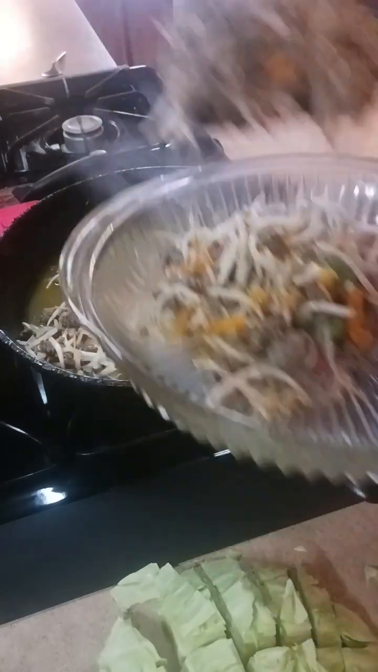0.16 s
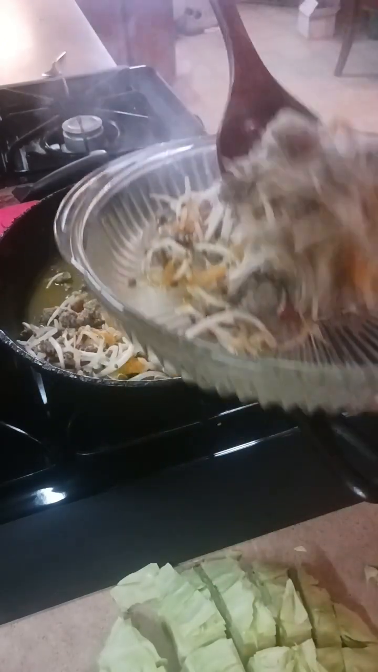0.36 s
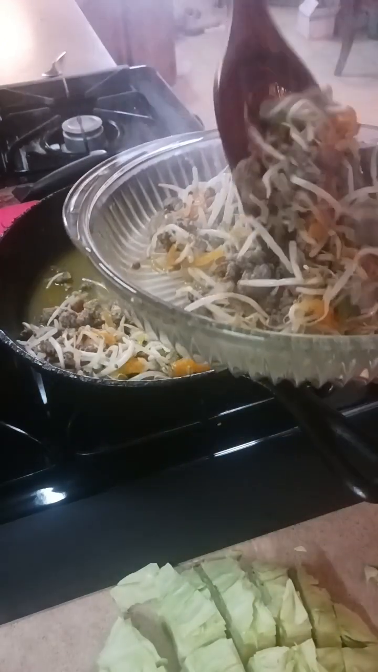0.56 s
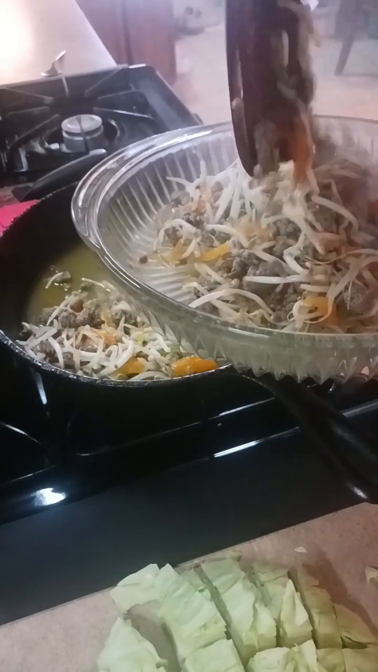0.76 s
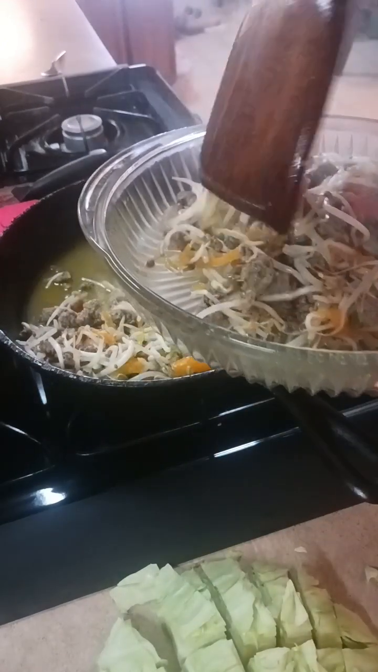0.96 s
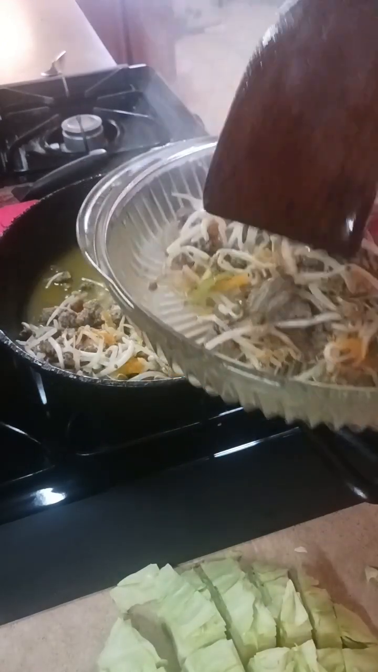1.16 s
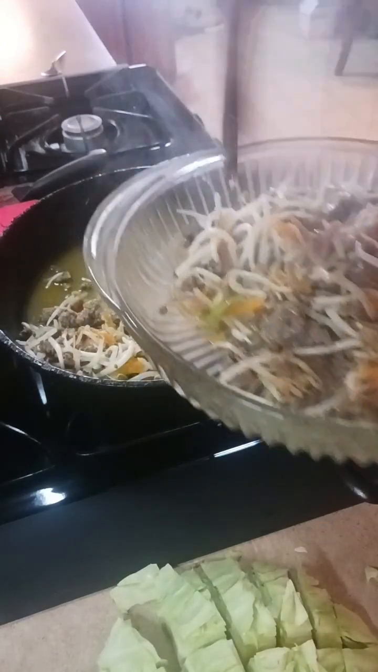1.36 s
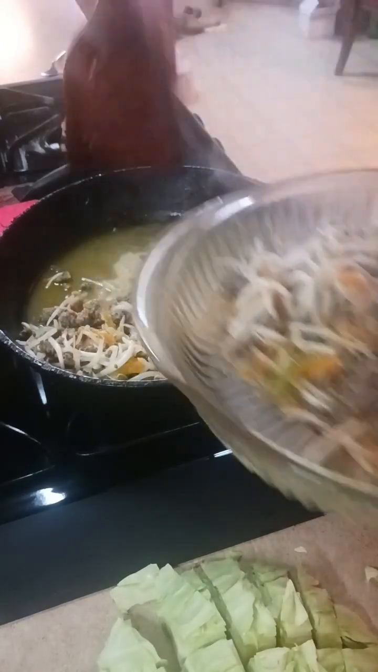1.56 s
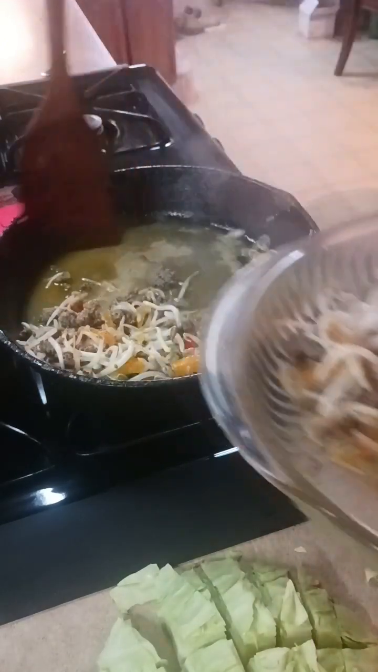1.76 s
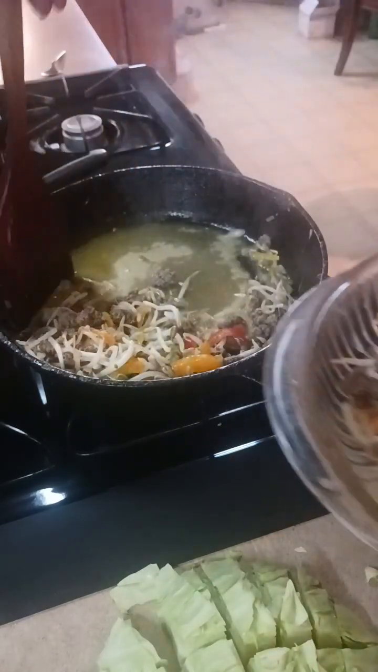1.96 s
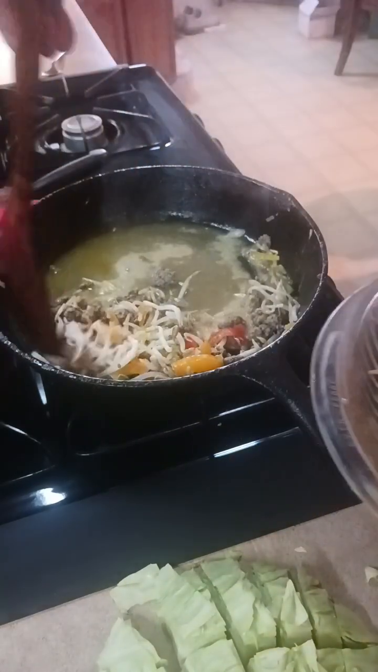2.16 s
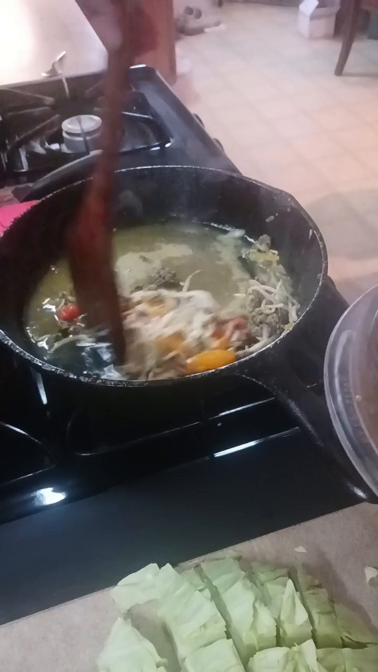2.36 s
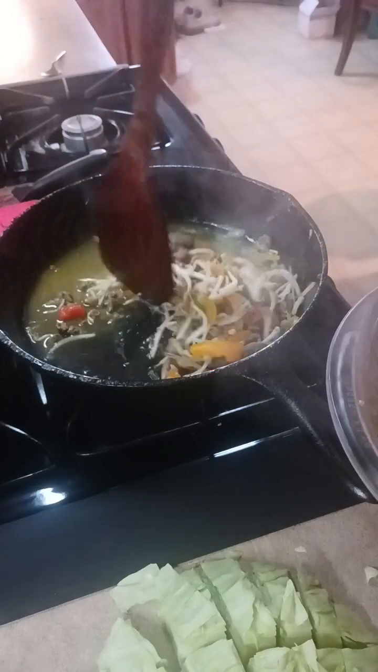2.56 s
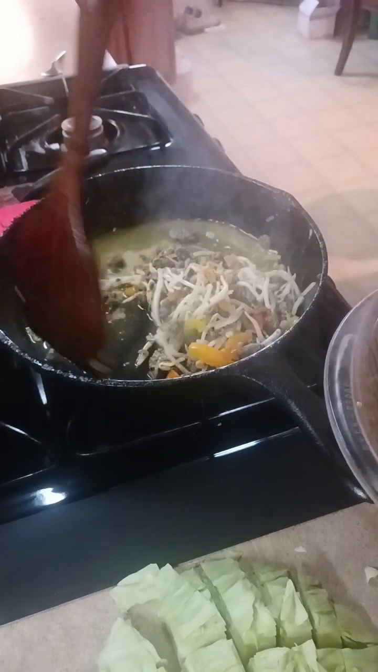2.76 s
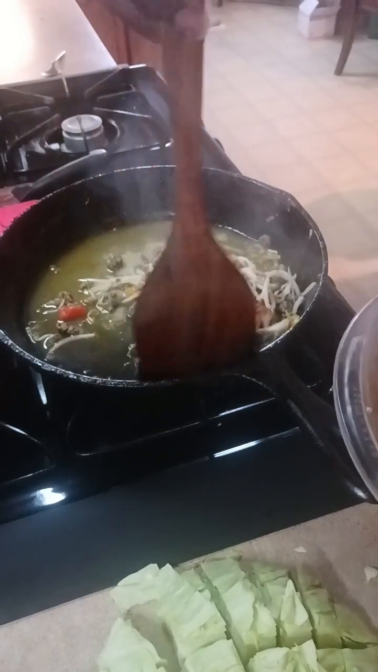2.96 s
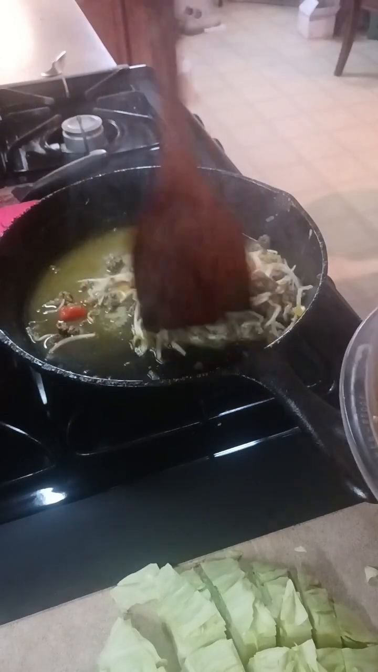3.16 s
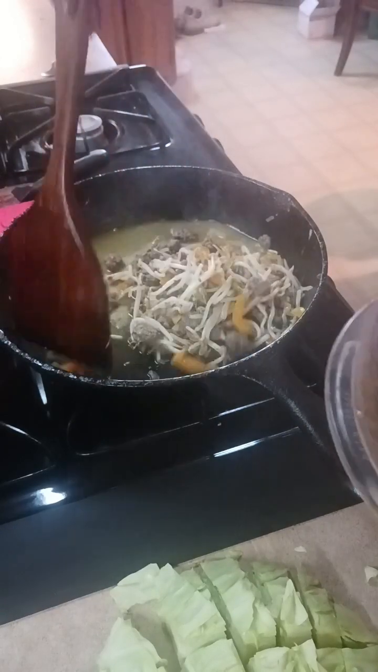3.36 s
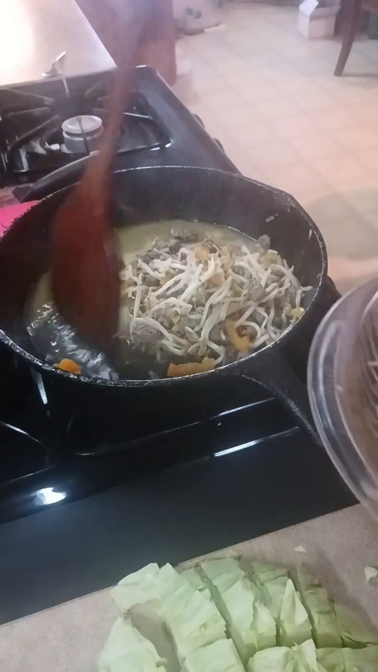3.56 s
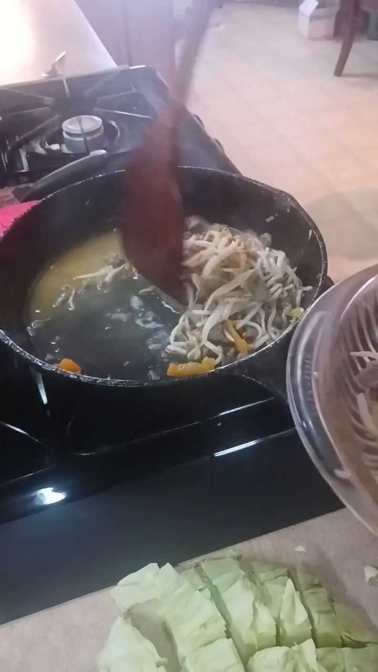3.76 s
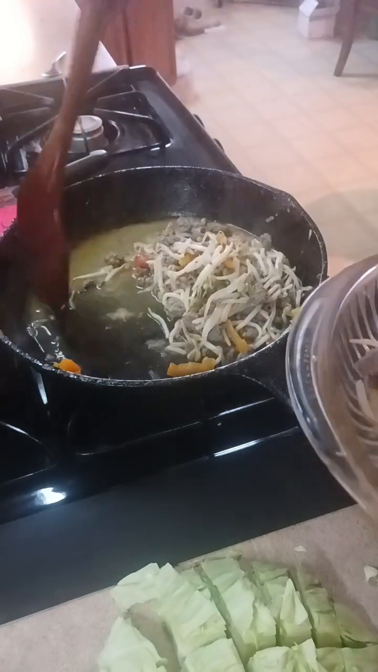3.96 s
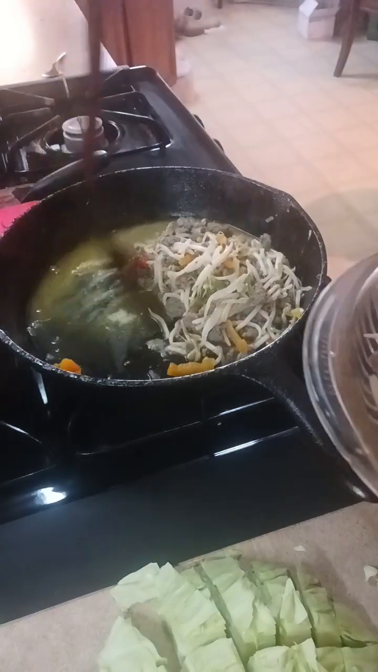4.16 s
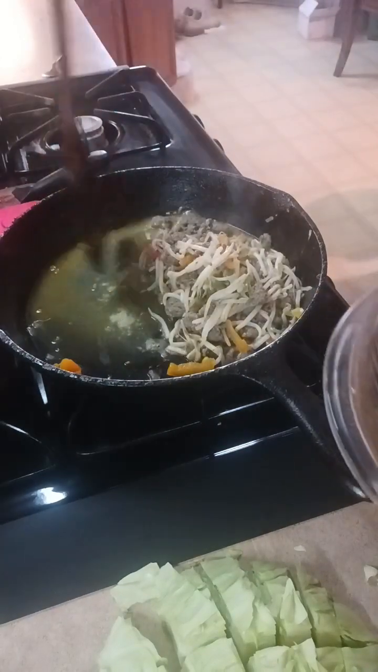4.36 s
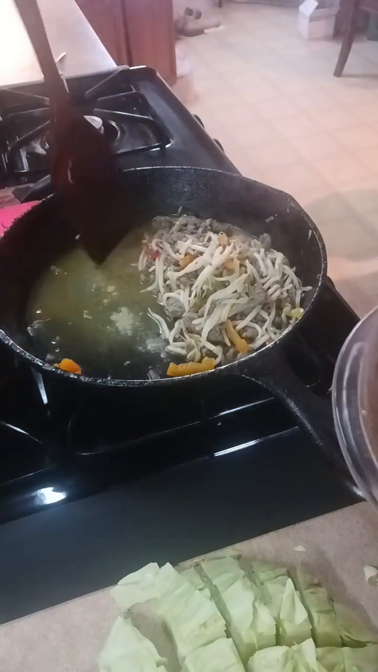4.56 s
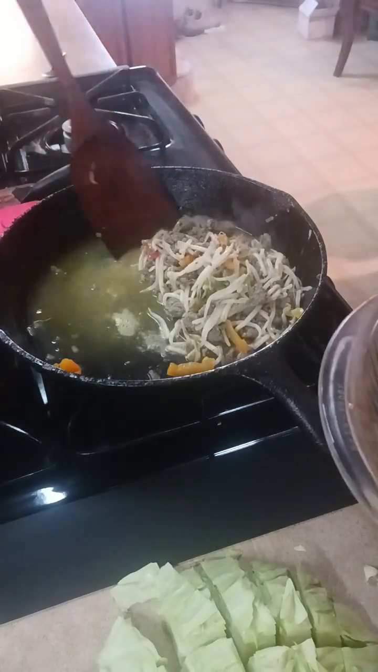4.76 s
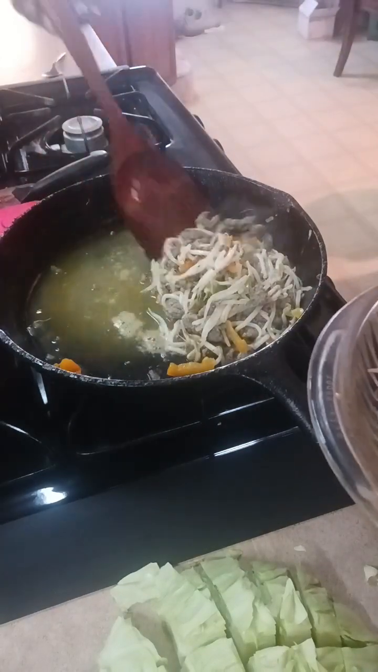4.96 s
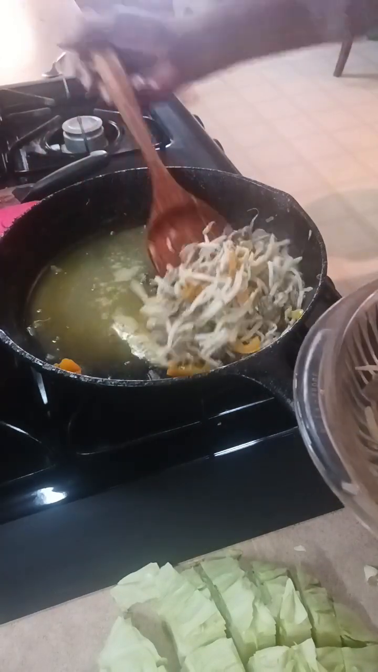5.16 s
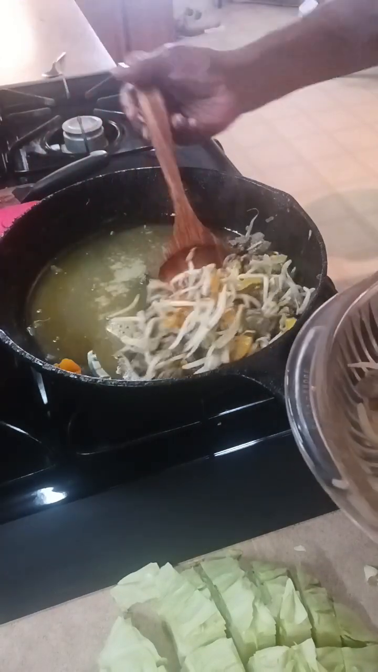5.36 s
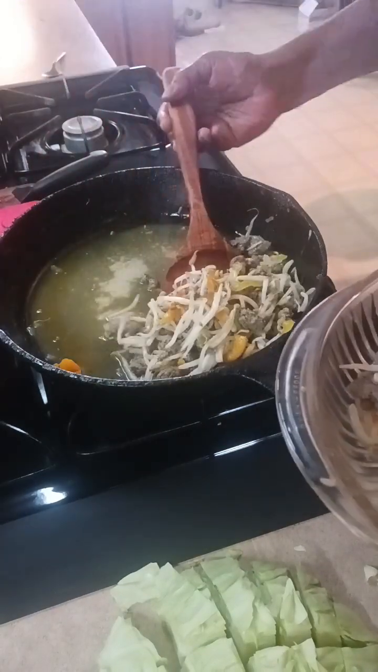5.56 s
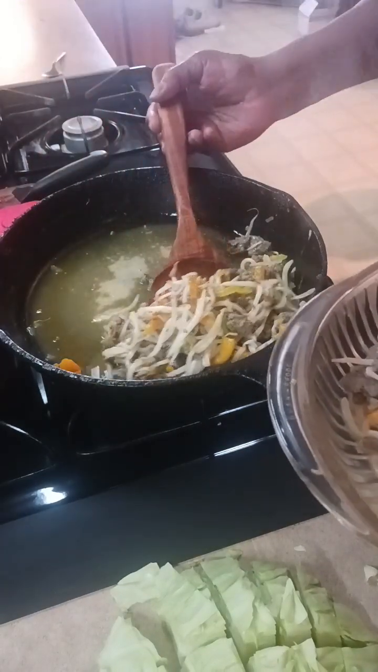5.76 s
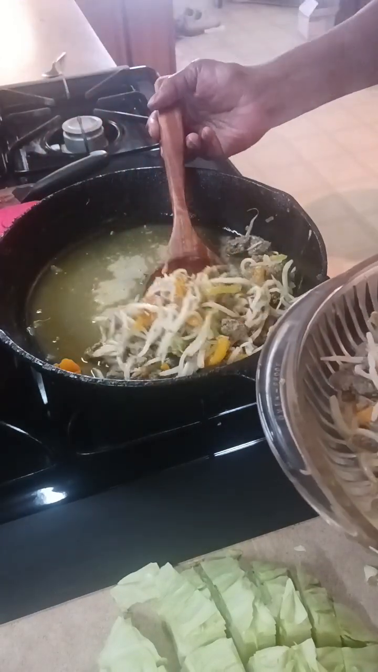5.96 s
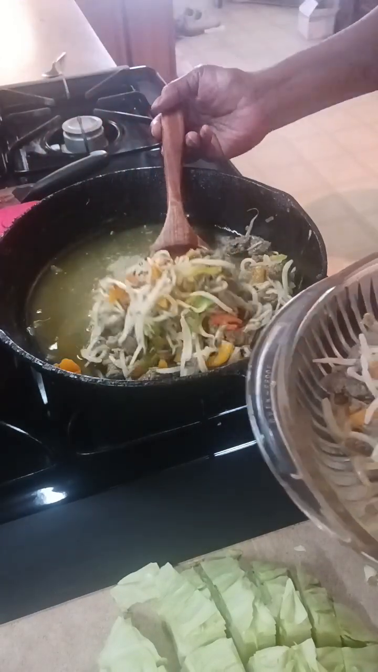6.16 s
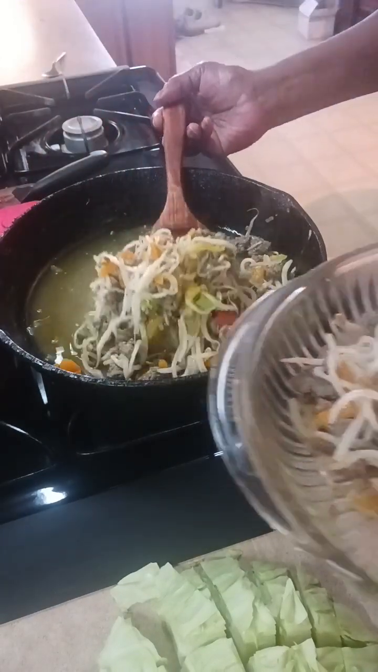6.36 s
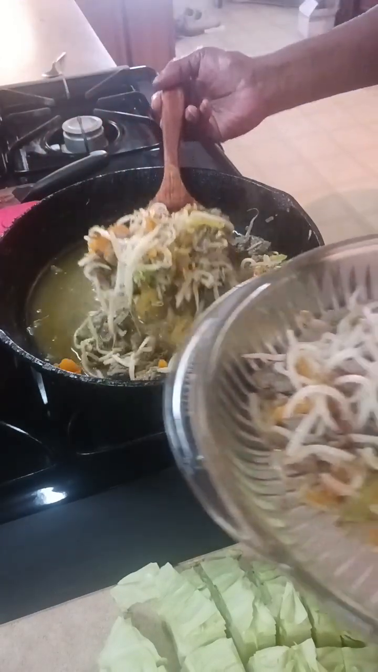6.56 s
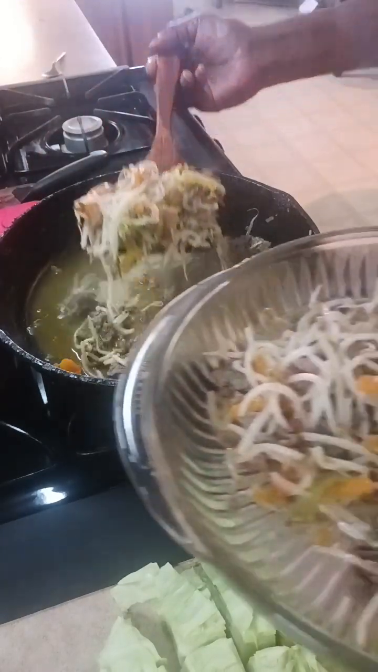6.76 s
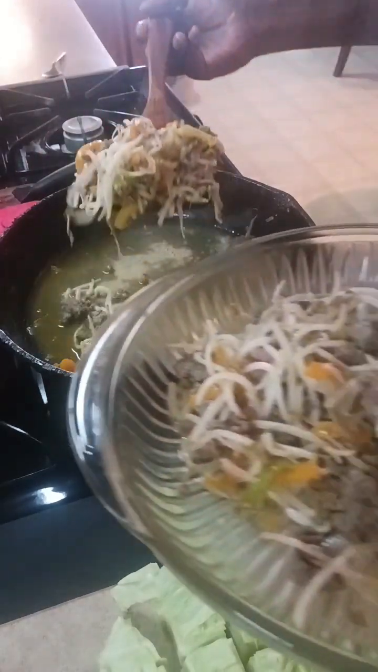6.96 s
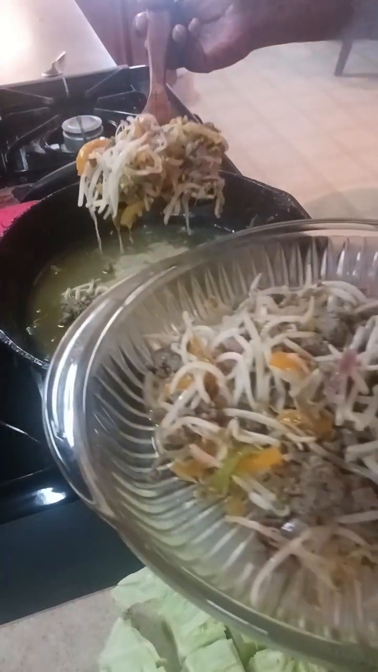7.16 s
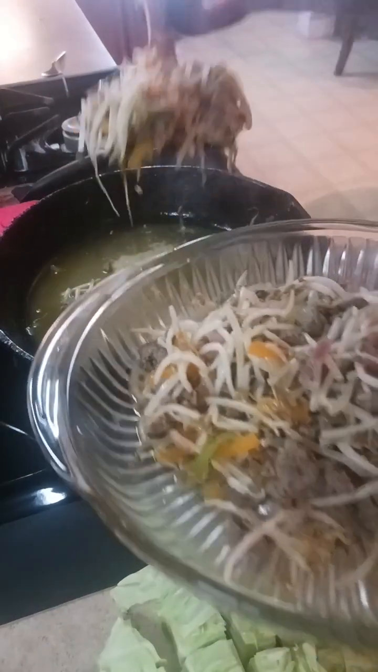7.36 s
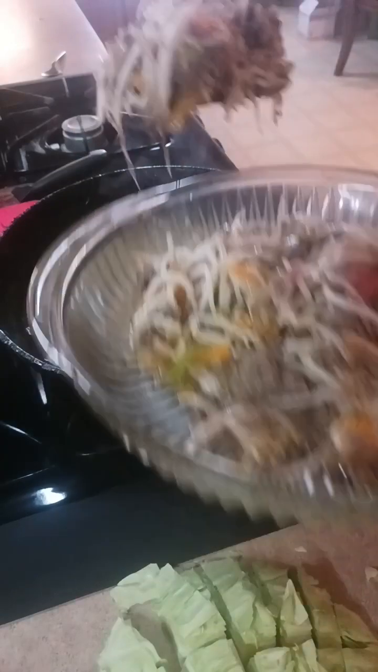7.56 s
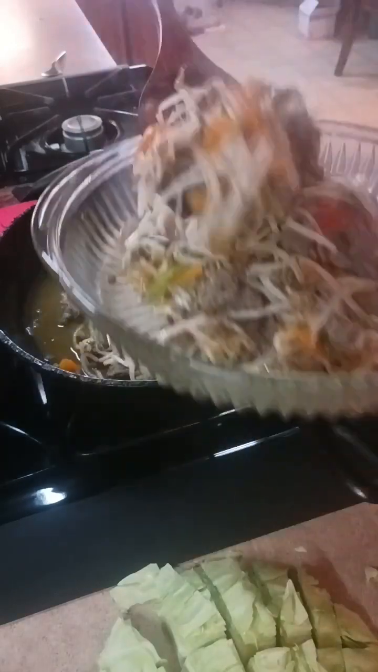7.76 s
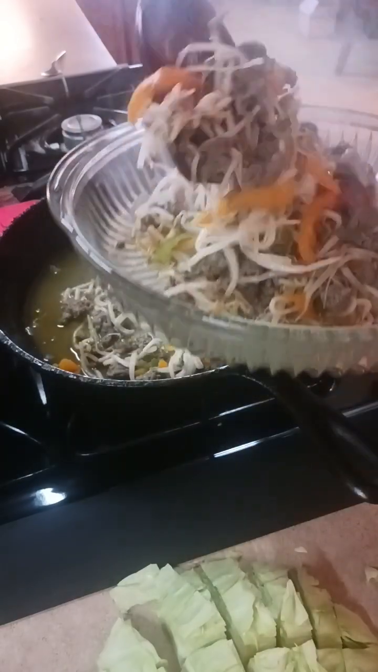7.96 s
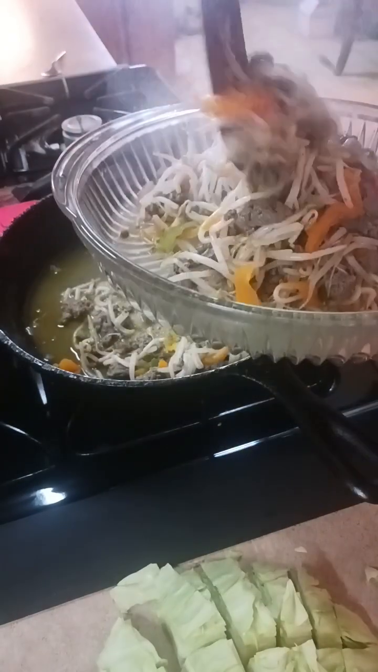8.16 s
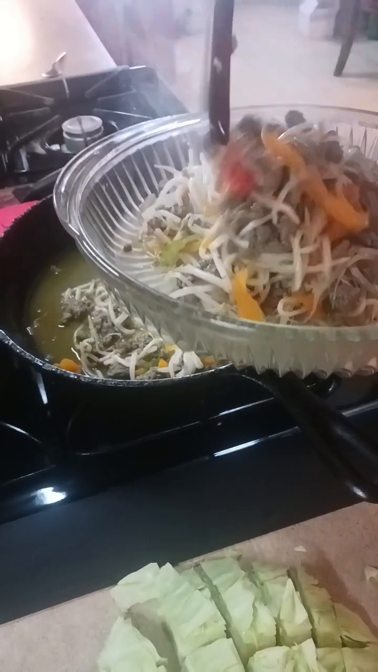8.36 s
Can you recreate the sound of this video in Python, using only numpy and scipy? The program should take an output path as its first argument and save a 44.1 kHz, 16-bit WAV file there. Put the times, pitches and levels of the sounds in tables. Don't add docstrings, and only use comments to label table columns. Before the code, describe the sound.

Close stereo pickup in a small kitchen: faint fine sizzle and a wavering low extractor rumble. After nearly two quiet seconds, a wooden spoon touches softly, then knocks a cast-iron pan and drags grittily through it. Harder clacks with short metallic ring and scrapes follow, strongest around the middle, ending in a small rising squeak. Then mostly simmer, with one tiny bright spit of fat.

```python
import sys
import numpy as np
from scipy import signal
from scipy.fft import rfft, irfft, next_fast_len
from scipy.io import wavfile
from scipy.ndimage import uniform_filter1d

SR = 44100
rng = np.random.default_rng(int(sys.argv[2]) if len(sys.argv) > 2 else 0)


def magnitude_from_level(level_db):
    exponent = np.asarray(level_db, float) / 20
    return 10 ** exponent


def bounce(signal):
    frames = np.transpose(np.atleast_2d(signal))
    limited = np.clip(frames, -1, 1)
    pcm = np.round(limited * 32767).astype(np.int16)
    wavfile.write(sys.argv[1], SR, pcm)


N = 374409

# frequency in Hz, level in dB, T60 in seconds.
IRON = [(318, -18, .5), (455, -14, .9), (721, -15, 1.0), (808, -14, .3), (1111, -3, .5), (1378, -9, .3),
        (1626, -9, .5), (1852, -12, .6), (2170, 9, .22), (2302, -12, .6), (2459, -4.5, .95),
        (2606, -14, .4), (2940, -17, .35), (3338, -14, .4), (3833, -10, .6), (3994, -12, .18),
        (4134, -10, .4), (4498, -10, .2), (5370, -16, .2), (5776, -20, .16), (6821, -14, .2),
        (7570, -28, .2), (8500, -30, .15)]
CONTACT_LAG_S = 0.0006


def in_time(rows, outside=None):
    s, *columns = np.transpose(rows)
    return [np.interp(np.arange(N) / SR, s, c, outside, outside) for c in columns]


def rms_one(x):
    return x / np.sqrt(np.mean(x ** 2) + 1e-20)


def at_hz(points, hz):
    table_hz, value = np.array(points)[:, :2].T
    return np.interp(np.log(hz + 1), np.log(table_hz), value)


def drift(rate_hz):
    steps = rng.standard_normal(int(N / SR * rate_hz) + 2)
    curve = np.interp(np.arange(N) / SR * rate_hz, np.arange(len(steps)), steps)
    return uniform_filter1d(curve, size=200)


def coloured(white, spectrum):
    # frequency in Hz, left-right likeness (1 = same, -1 = opposite).
    likeness = [(60, 0.98), (180, 0.8), (550, 0.56), (1650, -0.15), (4970, -0.14), (15000, 0.12)]
    # frequency in Hz, left minus right in dB.
    lean = [(60, 1.5), (110, -5), (200, -3.5), (380, 5.5), (700, 0.5), (1290, 5.5), (2380, 2.5), (4400, 3),
            (8120, -3), (15000, 5)]
    size = next_fast_len(N)
    hz = np.arange(size // 2 + 1) * SR / size
    mid, side = rfft(white, size)
    alike = np.clip(at_hz(likeness, hz), -1, 1)
    pair = np.sqrt(1 + alike) * mid + np.sqrt(1 - alike) * side * [[1], [-1]]
    gain_db = at_hz(spectrum, hz) + at_hz(lean, hz) * [[.5], [-.5]]
    return rms_one(irfft(pair * magnitude_from_level(gain_db), size)[:, :N])


def mic_phases(modes):
    # frequency in Hz, radians by which left leads.
    lead = [(100, .4), (250, 1.0), (500, 1.2), (1100, 1.8), (2200, 1.6), (4200, 1.8), (9000, 1.5)]
    hz = np.array(modes)[:, 0]
    scatter = 0.35 * rng.standard_normal(len(hz))
    return np.transpose([0 * hz, -at_hz(lead, hz) + scatter])


def ring(push, hz, t60_s, phases):
    # frequency in Hz, left minus right in dB.
    pan_lean = [(60, -1.0), (130, -5.5), (290, 0), (640, -8.5), (1410, -1), (3100, 5), (6820, 7),
                (15000, 2.5)]
    shift_db = -1.6
    r, w = magnitude_from_level(-60 / (t60_s * SR)), 2 * np.pi * hz / SR
    poles = [1, -2 * r * np.cos(w), r * r]
    pair = [signal.lfilter([np.sin(p), r * np.sin(w - p)], poles, push + 1e-18) for p in phases]
    return np.array(pair) * magnitude_from_level((at_hz(pan_lean, hz) + shift_db) * np.array([[.5], [-.5]]))


def body(push, modes, phases=None):
    phases = mic_phases(modes) if phases is None else phases
    return sum((-1) ** k * magnitude_from_level(db) * ring(push, hz, t60_s, phases[k])
               for k, (hz, db, t60_s) in enumerate(modes))


def as_modes(peaks):
    return [(hz, db, np.log(1000) / np.pi / width_hz) for hz, width_hz, db in peaks]


def resonances(push, peaks):
    return body(push, [(hz, db + 20 * np.log10(2 * np.log(1000) / t60_s / SR), t60_s)
                       for hz, db, t60_s in as_modes(peaks)])


def add(out, sound, s, pan_db):
    i = round(s * SR)
    out[:, i:i + sound.shape[1]] += (sound * magnitude_from_level([[pan_db / 2], [-pan_db / 2]]))[:, :N - i]


def contact(seconds, spread_s, rattle):
    t = np.arange(round(seconds * SR)) / SR
    return (t == 0) + rattle * rng.standard_normal(len(t)) * np.exp(-t / spread_s)


def softened(x, cut_hz):
    return signal.sosfilt(signal.butter(2, min(cut_hz, .45 * SR), fs=SR, output="sos"), x)


def grains(per_s, uneven_db, channels):
    shape = (channels, N)
    sizes = magnitude_from_level(uneven_db * np.minimum(rng.exponential(1, shape), 5)) * rng.choice([-1, 1], shape)
    return rms_one(sizes * (rng.random(shape) < per_s / SR))


def fan():
    # frequency in Hz, level in dB per Hz.
    spectrum = [(12, -59.5), (20, -44), (39, -17), (59, 3), (81, -10), (101, -2.5), (117, 0), (140, -11),
                (186, -15.5), (210, -26.5), (270, -17.5), (375, -26.5), (428, -15.5), (536, -35),
                (700, -28.5), (910, -78), (1540, -120)]
    # time in seconds, level in dB.
    waver = [(0, -49), (.6, -49.5), (1.45, -53.5), (2.27, -47.5), (2.55, -52.5), (3.45, -47), (3.7, -59),
             (4.1, -47), (4.35, -58), (4.63, -42), (4.8, -48), (5.5, -53.5), (6.3, -52), (7.4, -50),
             (8.49, -52)]
    right_lag_samples = 5
    (level_db,) = in_time(waver)
    left, right = coloured(rng.standard_normal((2, N)), spectrum) * magnitude_from_level(level_db + 1.0 * drift(6))
    return np.array([left, np.roll(right, right_lag_samples)])


def sizzle():
    # frequency in Hz, level in dB per Hz.
    simmer_spectrum = [(290, -23.5), (500, -2.5), (586, -11.5), (634, -10), (1070, -5.5), (1620, -4),
                       (1760, 0), (2010, -3), (2860, 0.5), (3100, -2), (4020, 0), (5220, -6), (7500, -10),
                       (9750, -39.5), (16500, -120)]
    # frequency in Hz, level in dB per Hz.
    hiss_spectrum = [(3820, -24), (6500, -13), (7430, -4.5), (8250, -3), (9630, -0.5), (13000, 3),
                     (15400, -4.5)]
    # time in seconds, level in dB.
    vigour = [(0.0, -62), (1.63, -61), (2.08, -57.5), (2.24, -56.5), (2.58, -62), (3.22, -61.5),
              (3.5, -59.5), (3.69, -62.5), (3.9, -64), (4.26, -59.5), (4.49, -66), (4.68, -59.5),
              (4.99, -61), (5.25, -66), (5.46, -68.5), (5.72, -67), (6.1, -64), (8.49, -60)]
    (hiss_db,) = in_time(vigour)
    simmer_db = -58 + 0.8 * (hiss_db - hiss_db.mean())
    bubbles = grains(12000, 2.15, channels=2) * magnitude_from_level(0.72 * drift(17))
    simmer = coloured(bubbles, simmer_spectrum) * magnitude_from_level(simmer_db + 1.39)
    return simmer + coloured(bubbles, hiss_spectrum) * magnitude_from_level(hiss_db + 2.5)


def knocks(iron_phases):
    # start in seconds, peak in dB, iron ring in dB, crash in dB,
    # left minus right in dB.
    rim_blows = [(3.34, -8, -16, -7, 1.1)]
    wall_blows = [(4.468, -10.5, -11.5, -13, 2)]
    tip_blows = [(2.18, -11, -21.5, -15.5, 0.1)]
    flat_blows = [(4.586, -3.5, -37, -13, 1.6)]
    soft_blows = [(1.857, -26.5, -38, -24, 1.5), (4.047, -14, -36.5, -23, -1.1)]
    heel_blows = [(4.024, -21, -16.5, -11.5, 0.087)]
    light_blows = [(2.803, -26.5, -32, -14, 3.6)]
    # frequency in Hz, width in Hz, level in dB.
    rim = [(1460, 67, -17), (2130, 71, -0.5), (2459, 3, -15), (4190, 18, -12), (2940, 115, -8),
           (3324, 32, -3), (4140, 73, 9), (5500, 76, -9), (6000, 90, -8.5), (7020, 84, -10),
           (7370, 106, -12), (8050, 202, -9.5), (8695, 92, -14), (9220, 180, -12.5), (10500, 100, -15),
           (11030, 84, -16)]
    wall = [(1500, 110, 4), (2122, 50, 7.5), (3220, 190, 12), (4170, 150, 12.5), (4669, 95, 1.5),
            (5820, 120, 9.5), (3835, 9, -15), (1650, 22, -14), (6926, 120, -8), (8100, 100, -10.5),
            (2710, 160, 1.5), (11700, 86, -9.5), (12800, 240, -41)]
    tip = [(1680, 203, 8), (2173, 42, 7), (2640, 70, 5.5), (2972, 87, 3.5), (4230, 97, 4.5),
           (6070, 180, -34), (8000, 94, -61), (10900, 100, -40), (12000, 130, -40)]
    flat = [(678, 240, -11), (1625, 82, 5), (1970, 38, 3.5), (2840, 110, -19), (3364, 140, 4),
            (4080, 70, -8.5), (5820, 330, -9.5), (6680, 98, -23.5), (11300, 150, -18.5), (13700, 250, -40)]
    soft = [(960, 135, 2.5), (1470, 100, 2), (1916, 99, 1), (2220, 90, -2.5), (2850, 68, -16),
            (3230, 31, -13), (4300, 310, -14), (8610, 110, -42)]
    heel = [(1180, 190, -1), (1550, 120, -5), (2180, 50, 2), (2640, 100, -6), (4200, 150, -9),
            (5940, 100, -33.5), (7350, 93, -39), (8140, 220, -35.5)]
    light = [(463, 113, -1.5), (1530, 56, 4), (2250, 100, -2), (2950, 120, -4), (3240, 120, 3.5),
             (3790, 52, -23), (5510, 110, -16)]
    # second touch after seconds, its level in dB, rattle decay in seconds, rattle size.
    landings = [
        (.009, -9, 0.0064, 0.05),
        (.0065, -12.5, 0.0048, 0.034),
        (.002, -10.5, 0.0016, .05),
        (0.0043, -8.5, 0.0045, 0.057),
        (0.0042, -8.5, .004, 0.068),
        (0.00432, 3, 0.0042, .06),
        (.0065, -20, 0.0027, 0.059),
    ]
    # frequency in Hz, level in dB per Hz.
    crash_spectrum = [(180, -44), (300, -25.5), (1100, -24), (1930, -5), (2210, -5.5), (2740, -12.5),
                      (4090, -14), (12300, -37.5), (16000, -51)]
    crash_t60_s, crash_s_per_db = 0.17, 0.004
    crack_db = -2

    out = np.zeros((2, N))
    crash = coloured(rng.standard_normal((2, N)), crash_spectrum)
    dull = softened(crash, cut_hz=4500)
    places = [(rim_blows, rim), (wall_blows, wall), (tip_blows, tip), (flat_blows, flat),
              (soft_blows, soft), (heel_blows, heel), (light_blows, light)]
    for (blows, place), (again_s, again_db, rattle_s, rattle) in zip(places, landings):
        for s, db, iron_db, crash_db, pan_db in blows:
            blow = contact(seconds=0.46, spread_s=rattle_s, rattle=rattle)
            twice = blow + magnitude_from_level(again_db) * np.roll(blow, round(again_s * SR))
            uneven = [(hz, level_db + 1.2 * rng.standard_normal(), ring_s) for hz, level_db, ring_s in IRON]
            modes = body(twice, as_modes(place)) + magnitude_from_level(iron_db) * body(blow, uneven, iron_phases)
            crack = magnitude_from_level(crack_db + .5 * iron_db) * np.gradient(twice)

            t60_s = max(crash_t60_s + crash_s_per_db * iron_db, .03)
            t = np.arange(len(blow)) / SR
            part = slice(round(s * SR), round(s * SR) + len(blow))
            noisy = dull[:, part] * magnitude_from_level(-60 * t / t60_s)
            noisy = noisy + (crash - dull)[:, part] * magnitude_from_level(-60 * t / (1.2 * t60_s))

            sound = softened(modes + crack, cut_hz=11500) + magnitude_from_level(crash_db + 6.5) * noisy
            add(out, magnitude_from_level(db - 11.5) * sound, s + CONTACT_LAG_S, pan_db)
    return out


def pressed(t, s, held_s, rise_s, fall_s, sag_db):
    corners_s = [-rise_s, 0, held_s, held_s + fall_s]
    return magnitude_from_level(np.interp(t - s, corners_s, [-50, 0, -2 * sag_db, -2 * sag_db - 50], -240, -240))


def pressure_db():
    # start in seconds, held seconds, level in dB.
    rocks = [(1.863, 0.068, -46), (1.96, .07, -55), (2.19, .3, -51), (2.81, 0.16, -55), (3.35, 0.13, -47.5),
             (3.52, .15, -60), (4.055, 0.12, -51.5), (4.48, .08, -54), (4.6, .12, -49), (4.79, .14, -50),
             (6.19, 0.074, -63)]
    # full pressure at seconds, held seconds, edge in dB,
    # blade against edge in dB, grit against edge in dB.
    strokes = [(1.9, 0.084, -52.5, -1, -0.5), (2.03, 0.058, -57.5, 0, -1), (2.21, 0.12, -53.5, 0, -1),
               (2.405, 0.03, -44.5, 2, -3), (2.49, 0.15, -71, 9, 7), (2.835, 0.032, -54.5, 0, 5.5),
               (2.91, 0.044, -52.5, -12, 2), (3.02, 0.0394, -61, -4, -1.5), (3.38, 0.098, -36, -3, -8.5),
               (3.56, 0.11, -49, 2.5, -1.5), (4.08, 0.073, -47, 0, -8.5), (4.179, 0.05, -40.5, 1.5, -7),
               (4.28, 0.043, -65, 7, -5.5), (4.61, 0.0654, -35, -8.5, -18), (4.7, 0.045, -54, 8.5, -10.5),
               (4.79, 0.13, -56.5, 6, 3.5), (4.98, .3, -57, -16, 1.5), (6.185, 0.08, -84, 15.5, 15)]
    # start in seconds, edge in dB, T60
    # in seconds, # blade against edge in dB, grit against edge in dB.
    skids = [(1.862, -44, 0.18, 0.5, -4.5), (2.186, -32, 0.0504, -2.5, -7), (2.808, -45.5, .1, -15, -1),
             (2.84, -49.5, .12, -17.5, -1), (2.912, -54, .15, -14.5, -6), (2.968, -48, 0.079, -9, 3.5),
             (3.35, -36, 0.12, -3.5, -1), (4.053, -26, 0.054, -15, -19.5), (4.475, -41.5, 0.53, -2.5, -2.5),
             (4.596, -26, 0.0576, -15.5, -8)]
    hop = 20
    t = np.arange(0, N, hop) / SR
    power = np.full((4, len(t)), 1e-12)
    for s, held_s, db in rocks:
        power[0] += magnitude_from_level(db) ** 2 * pressed(t, s, held_s, rise_s=0.017, fall_s=0.23, sag_db=5.5)
    for s, held_s, db, blade_db, grit_db in strokes:
        peak = magnitude_from_level(db + np.array([[blade_db], [0], [grit_db]])) ** 2
        power[1:] += peak * pressed(t, s, held_s, rise_s=0.053, fall_s=0.084, sag_db=5.5)
    for s, db, t60_s, blade_db, grit_db in skids:
        peak = magnitude_from_level(db + np.array([[blade_db], [0], [grit_db]])) ** 2
        power[1:] += peak * (t >= s) * magnitude_from_level(-120 * np.abs(t - s) / t60_s)
    return np.repeat(10 * np.log10(power), hop, axis=1)[:, :N]


def drags(iron_phases):
    # frequency in Hz, level in dB per Hz.
    grit_spectrum = [(1350, -31.5), (2300, 0), (2530, -14.5), (2700, 3.5), (3160, -1.5), (4310, -2.5),
                     (6170, -11), (13800, -14.5), (15400, -29.5)]
    # frequency in Hz, width in Hz, level in dB.
    grate = [(299, 49, -0.5), (324, 25, 1.5), (458.2, 12, 3)]
    grip_s = [1.8, 2.17, 2.75, 3.3, 3.52, 4.0, 4.44, 4.58, 4.93, 5.9, 6.5]
    # frequency in Hz, width in Hz, level in dB.
    blades = [
        [(500, 40, 4), (816, 90, -4), (1010, 150, -9)],
        [(554, 120, -1), (806, 190, -0.5), (1055, 79, -1.5)],
        [(560, 130, -4.5), (830, 81, -3), (963, 90, -1)],
        [(600, 150, -6), (820, 110, -1.5), (1130, 130, 0)],
        [(580, 110, 0), (800, 99, 0), (986, 90, 0)],
        [(560, 110, -11.5), (730, 110, 0), (1000, 140, -5)],
        [(560, 180, -6), (800, 150, -6), (1050, 150, -1.5)],
        [(600, 140, -2), (810, 110, 0), (980, 130, -2)],
        [(900, 200, 0)],
        [(523, 150, -6), (715, 66, 4), (990, 150, -9)],
    ]
    # frequency in Hz, width in Hz, level in dB.
    edge_peaks = [
        [(1373, 73, 1), (1600, 150, 0), (2150, 120, -5), (2980, 200, -9)],
        [(1300, 160, 4.5), (1642, 96, 0), (2100, 110, -3), (2470, 95, -6)],
        [(1500, 170, 4), (2210, 150, -2), (2580, 90, -6), (2913, 160, -2)],
        [(1388, 120, 0), (1850, 140, -2), (2170, 90, 2), (2490, 200, -6), (3120, 150, -2)],
        [(1210, 90, 2), (1430, 110, 2), (1850, 150, -5.5), (2900, 140, -8)],
        [(1292, 70, 3), (1550, 150, -2.5), (1913, 140, -6), (2200, 80, -15.5), (2890, 60, -8),
         (3970, 80, -12.5)],
        [(1510, 180, -5.5), (1850, 150, -6), (2750, 200, -9), (3340, 150, -9.5)],
        [(1455, 120, -1.5), (1600, 80, 2), (1840, 87, -3.5), (1980, 90, -3), (2600, 150, -15.5),
         (3450, 78, -16)],
        [(1266, 100, 1.5), (1740, 130, 0), (2179, 90, 2), (2570, 110, -1), (3040, 110, -6)],
        [(1400, 200, 0)],
    ]
    grate_db, blade_db, edge_db, grit_db = pressure_db()
    slips = grains(4000, 2.1, channels=1)[0] * magnitude_from_level(2.6 * drift(60))
    out = coloured(grains(6000, 2.2, channels=2), grit_spectrum) * magnitude_from_level(grit_db + 2.2 * drift(70))
    whole = slice(round(grip_s[0] * SR), round(grip_s[-1] * SR))
    out[:, whole] += rms_one(resonances(slips[whole], grate)) * magnitude_from_level(grate_db[whole])
    for start, end, blade, edge in zip(grip_s, grip_s[1:], blades, edge_peaks):
        part = slice(round(start * SR), round(end * SR))
        for db, peaks in [(blade_db, blade), (edge_db, edge)]:
            out[:, part] += rms_one(resonances(slips[part], peaks)) * magnitude_from_level(db[part])
    out[:, whole] += magnitude_from_level(-48.0) * body((slips * magnitude_from_level(grit_db))[whole], IRON[:18], iron_phases)
    return out


def bumps():
    # start in seconds, peak in dB, blade pitch in Hz, T60 in seconds, left minus right in dB.
    hits = [(2.843, -45, 2250, .02, 2), (2.917, -44.5, 1530, .03, 6), (2.963, -45.5, 2750, .03, 0),
            (2.972, -45, 1560, 0.023, 2), (3.164, -51, 4070, .015, 3), (3.412, -44, 1850, .015, 0),
            (3.451, -33, 1130, 0.02, -6), (3.452, -36, 1900, .015, 0), (3.615, -43, 980, 0.026, -6),
            (4.123, -47.5, 2900, .04, -1.5), (4.176, -37.5, 730, 0.043, 3), (4.172, -39, 2836, .07, 0),
            (4.2, -40, 750, .03, -0.5), (4.22, -35, 1300, .04, -0.5), (4.663, -27, 985, 0.033, -3),
            (4.729, -34, 941, 0.03, -4), (4.778, -50, 870, 0.02, 0), (4.776, -45, 3195, .03, 4),
            (4.778, -45, 4750, .09, 0)]
    out = np.zeros((2, N))
    for s, db, hz, t60_s, pan_db in hits:
        blow = softened(contact(seconds=.2, spread_s=0.003, rattle=0.05), cut_hz=2.1 * hz)
        modes = [(hz, 0, t60_s), (1.7 * hz, -18, .6 * t60_s), (2.9 * hz, -18, .4 * t60_s)]
        add(out, magnitude_from_level(db + 3.5) * body(blow, modes), s, pan_db)
    return out


def squeak(rows, second_db):
    # frequency in Hz, width in Hz, level in dB.
    wet_edge = [(1364, 70, 0), (1560, 69, -4), (1765, 60, 0), (2130, 50, 4.5), (3110, 80, -3.5),
                (3300, 160, -4), (2850, 90, -8.5)]
    per_s, db = in_time(rows, outside=-120)
    turns = 2 * np.pi * np.cumsum(per_s * (1 + .03 * drift(150))) / SR
    first = np.sin(turns) * magnitude_from_level(4.0 * drift(80))
    second = np.sin(2 * turns) * magnitude_from_level(second_db + 4.0 * drift(80))
    rough = 0.5 * rng.standard_normal(N)
    return resonances((first + second + rough) * magnitude_from_level(db), wet_edge)


def squeaks():
    # time in seconds, slips per second, pressure in dB.
    edge_slips = [(4.96, 770, -75), (4.98, 884, -55), (5.01, 1100, -48), (5.06, 1400, -49.5),
                  (5.095, 1500, -46), (5.15, 1700, -55), (5.19, 1700, -69), (5.23, 1340, -58),
                  (5.37, 1150, -58)]
    # time in seconds, slips per second, pressure in dB.
    corner_slips = [(5.05, 2260, -75), (5.1, 2050, -45), (5.18, 2450, -75)]
    return squeak(edge_slips, second_db=3) + squeak(corner_slips, second_db=-12)


def fat_bubble():
    # start in seconds, peak in dB.
    bursts = [(7.5398, -33)]
    # frequency in Hz, width in Hz, level in dB.
    spray = [(1305, 270, -16), (3000, 350, -1), (3495, 283, -1), (4710, 360, -1), (6020, 400, -6),
             (9740, 600, -8.5), (11540, 700, -3), (13050, 600, -0.5), (14400, 800, 1.5)]
    out = np.zeros((2, N))
    for s, db in bursts:
        blow = contact(seconds=.03, spread_s=0.0035, rattle=0.52)
        add(out, magnitude_from_level(db - 13.5) * body(blow, as_modes(spray)), s + CONTACT_LAG_S, 0)
    return out


def kitchen(x):
    t60_s, treble_t60_s, wall_cut_hz = 0.42, 0.25, 4100
    t = np.arange(SR // 2) / SR
    echoes = rng.standard_normal((2, len(t))) * np.clip((t - .003) / 0.0031, 0, 1)
    dull = signal.sosfilt(signal.butter(1, wall_cut_hz, fs=SR, output="sos"), echoes)
    tail = dull * magnitude_from_level(-60 * t / t60_s) + (echoes - dull) * magnitude_from_level(-60 * t / treble_t60_s)
    return signal.fftconvolve(x, tail / np.sqrt(np.sum(tail ** 2) / 2), axes=1)[:, :N]


def scene():
    iron_phases = mic_phases(IRON)
    close = knocks(iron_phases) + drags(iron_phases) + bumps() + squeaks() + fat_bubble()
    return fan() + sizzle() + close + magnitude_from_level(-12) * kitchen(close)


def low_pass(x):
    return signal.sosfilt(signal.butter(12, 15620, fs=SR, output="sos"), x)


def record(dry):
    return low_pass(1.328 * np.tanh(dry / 1.268))


dry = scene()
out = record(dry)
bounce(out)
```